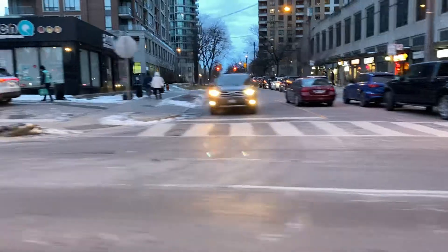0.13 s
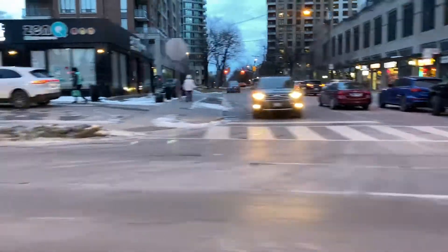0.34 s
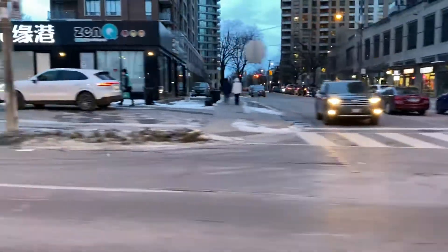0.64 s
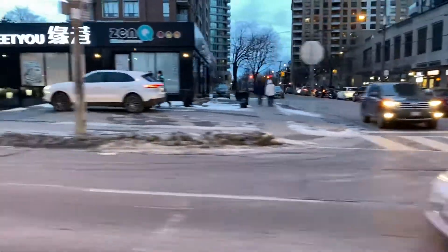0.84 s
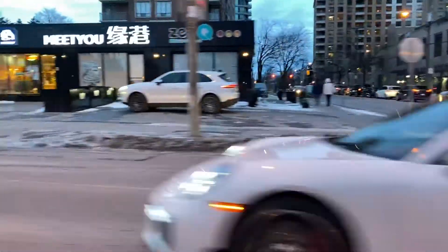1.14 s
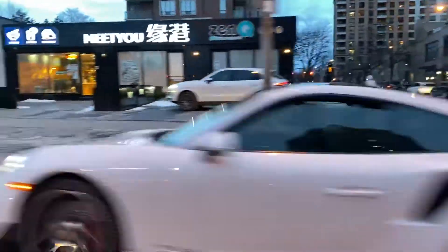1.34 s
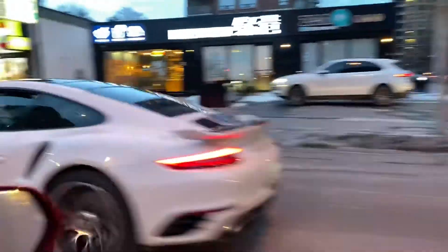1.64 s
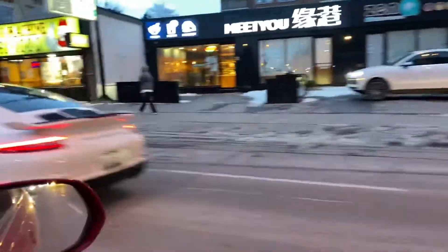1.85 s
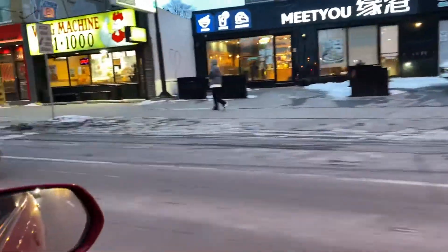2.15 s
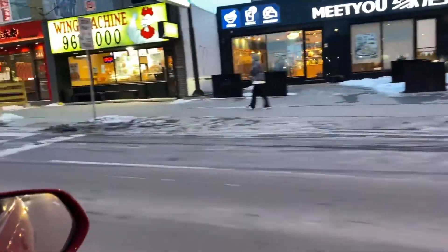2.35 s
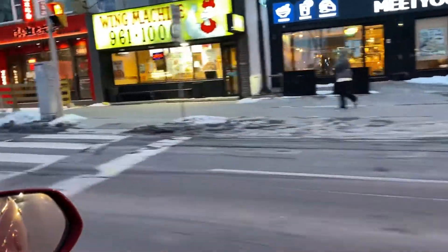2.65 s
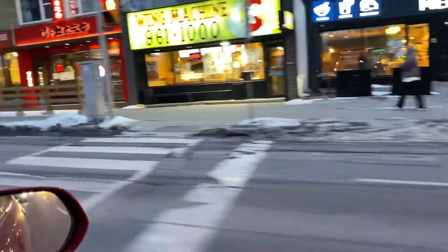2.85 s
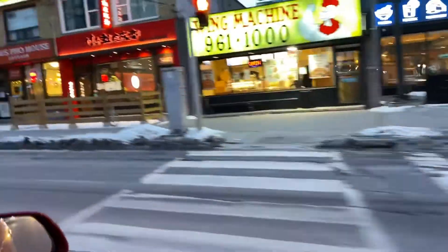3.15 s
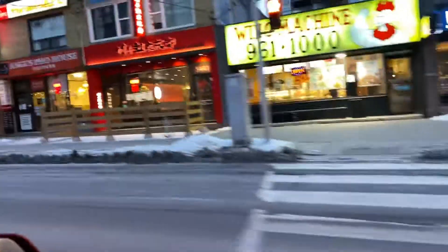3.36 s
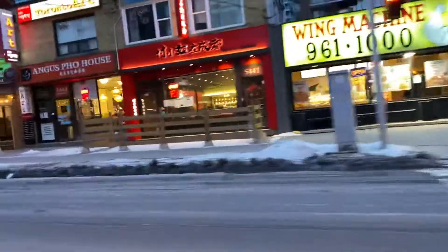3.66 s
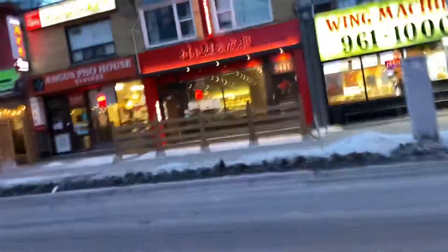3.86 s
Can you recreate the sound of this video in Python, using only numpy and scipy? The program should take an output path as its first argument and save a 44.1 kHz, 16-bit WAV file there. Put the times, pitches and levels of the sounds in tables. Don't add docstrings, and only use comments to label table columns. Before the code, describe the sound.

Heard from a phone in a car window, a turbo sports car pulls past loudly, snaps off the throttle, catches the next gear briefly, then recedes with low pops, chopped falling whistle and faint street rumble.

```python
import sys
import numpy as np
from scipy import signal
from scipy.io import wavfile
from scipy.ndimage import uniform_filter1d

SR = 44100
rng = np.random.default_rng(int(sys.argv[2]) if len(sys.argv) > 2 else 0)


def gain_from_decibels(decibels):
    exponent = np.asarray(decibels, float) / 20
    return 10 ** exponent


def inscribe(sig):
    pcm = np.round(np.clip(np.atleast_2d(sig).T, -1, 1) * 32767)
    wavfile.write(sys.argv[1], SR, pcm.astype(np.int16))


N = 176400
T = np.arange(N) / SR

# time_s, firing_hz, exhaust_level_db, gas_flow_db
ENGINE_RUN = [(0, 69.37, -15.5, -22.5), (.45, 76.66, -14.5, -24), (.62, 81.82, -12, -22),
              (.77, 85, -8.5, -17.5), (1.0, 91.06, -10.5, -29), (1.24, 97.83, -10.5, -25),
              (1.44, 97, -11, -24), (1.465, 89.3, -30.5, -34), (1.52, 73.56, -25, -37.5),
              (1.595, 66.96, -22, -31), (1.61, 66.12, -12, -28), (1.76, 64.59, -23, -37),
              (2.15, 64.02, -28, -44.5), (2.4, 63.87, -19, -40.5), (2.67, 62.7, -29, -42),
              (2.71, 63.11, -27.5, -48.5), (3.2, 60.84, -31.5, -48.5), (4, 61.2, -27.5, -45.5)]
# multiple_of_firing, loaded_db, throttle_shut_db, gear_catching_db, coasting_db
FIRING_ORDERS = [(.5, -15, -15, -22, -30), (1, -3, 6, -10, 0), (1.5, -22.5, -17, -29, -26),
                 (2, -6, -20, -7, -2), (3, .5, 4, 1.5, -8), (4, 0, -26, -8, -13.5),
                 (5, -5.5, -27, -26, -12.5), (6, -9, -39, -3.5, -8.5), (7, -14, -27, -20, -57),
                 (8, -24, -43, -27, -48), (9, -26, -37, -30, -49), (10, -13, -44, -41, -53)]
# frequency_hz, gain_db
PIPE_RESPONSE = [(40, -8.5), (97, 8), (170, -3), (230, 2.5), (285, 9.5), (330, -7.5), (400, 1.5), (900, -6)]
# frequency_hz, width_hz, gain_db
STANDING_WAVES = [(172.7, 17, 9), (196, 7, -1), (216.6, 10, 5.5), (338.6, 8.2, 4.5), (365, 6.3, -14.5),
                  (420, 30, 1), (467, 4.9, -6), (539, 24, 6.5), (647, 36, 2.5), (720, 30, 8),
                  (822, 25, 12.5)]
# frequency_hz, density_db_per_hz
LOADED_ROAR = [(40, -34), (90, -31), (280, -13), (450, -22), (750, -19.5), (1300, -28.5), (2500, -45),
               (16000, -64.5)]
# frequency_hz, density_db_per_hz
COASTING_ROAR = [(40, -62), (130, -3.5), (400, -17), (1250, -27.5), (2200, -38.5), (6500, -45.5),
                 (10000, -47), (16000, -49.5)]
# frequency_hz, density_db_per_hz
INTAKE_RUSH = [(600, -24), (1450, 2.5), (1800, 2.5), (2300, -1), (4000, -6), (8000, -12), (16000, -13.5)]
# frequency_hz, density_db_per_hz
STREET_WASH = [(26, -22), (48, 4.5), (125, -12), (160, -16.5), (370, -27), (2200, -43.5), (5000, -87.5),
               (16000, -71)]
# start_s, peak_db, pitch_hz
POP_EVENTS = [(.082, 3, 105), (0.089, -18, 380), (.174, -22, 600), (.789, -13, 766), (1.49, -20, 80),
              (1.578, -20, 245), (1.601, -30, 202), (1.788, -12, 390), (1.833, -11.5, 390),
              (1.88, -43, 380), (1.899, -16.5, 399), (1.928, -16, 350), (1.96, -23, 232.1),
              (1.995, -16.5, 393), (2.05, -16.5, 378), (2.193, -12.5, 349.3), (2.25, -18, 406),
              (2.328, -15, 420), (2.41, -16, 390), (2.477, -25, 366), (2.512, -18, 352), (2.542, -36, 300),
              (2.638, -22, 380), (2.68, -18, 376.5), (2.734, -33, 248), (3.021, -38, 319.6),
              (3.647, -23, 299), (3.896, -12.5, 390), (3.94, -13.5, 289.8), (3.97, -19, 240.7)]
# time_s, pitch_hz, level_db
SPOOL_DOWN = [(1.47, 12700, -45), (1.52, 11810, -39.5), (1.585, 11400, -34), (1.64, 10500, -42.5),
              (1.78, 9030, -34.5), (1.94, 7478, -40.5), (2.03, 6913, -54.5), (2.16, 6430, -51),
              (2.32, 5560, -45), (2.55, 4953, -50), (2.78, 4150, -52.5), (2.91, 3880, -44),
              (2.99, 3724, -49.5), (3.09, 3620, -42), (3.16, 3470, -48), (3.27, 3300, -47),
              (3.36, 3180, -56.5), (3.62, 2900, -64)]
# frequency_hz, width_hz, gain_db
DUCT_MODES = [(2950, 320, 10), (3290, 320, 10), (3690, 320, 10), (4080, 320, 8), (4400, 320, 5),
              (5050, 550, 4), (5700, 550, 5), (6450, 600, 1), (7200, 800, 1)]
# frequency_hz, coherence (0 to 1)
PORT_COHERENCE = [(60, .99), (350, .98), (900, .82), (1600, .72), (3000, .82), (5000, .82), (6800, .97),
                  (15000, .96)]
# frequency_hz, left_over_right_db
PORT_LEVEL = [(60, 2.4), (250, 3.4), (600, 1.8), (900, 3), (2000, 2.6), (5000, 2.2), (7000, .2), (16000, 0)]
# frequency_hz, right_lead_rad
NEAR_PHASE = [(0, 0), (300, -.25), (700, -.8), (1300, -.9), (2300, -.6), (3500, -.2), (6750, 0),
              (15300, 12.57), (22050, 12.57)]
# frequency_hz, right_lead_rad
FAR_PHASE = [(0, 0), (600, -1.1), (1300, -3.1), (2300, -6.6), (3500, -6.75), (6750, -6.28), (15300, 6.28),
             (22050, 6.28)]

LIFT_S, SHIFT_S, CATCH_END_S = 1.46, 1.6, 1.79
COASTING_DB, LOADED_DB = -21, -14
FULL_HZ = 97
POP_T60_S = 0.063
BURBLE_START_S, BURBLE_END_S, BURBLE_PER_S, BURBLE_DB = 2, 2.7, 300, -0.5
SWEEP, WOBBLE, CHOP_DB = .06, .018, 6.5
CHIRP_S = 3.0815
VENT_S, VENT_LEN_S, VENT_DB = 1.554, 0.17, -40.5
ECHO_DB, ECHO_T60_S = -11.5, 0.69
START_S = .0722


def evened(x):
    return x / np.sqrt(np.mean(x ** 2) + 1e-20)


def read(points, hz):
    f, value = np.transpose(points)
    return np.interp(np.log(hz + 1), np.log(f + 1), value)


def curve(table, column):
    rows = np.array(table)
    return np.interp(T, rows[:, 0], rows[:, column])


def slow(top_hz):
    t = T[::64]
    f = np.geomspace(top_hz / 12, top_hz, 16)[:, None]
    sines = np.sin(2 * np.pi * (f * t + rng.random((16, 1))))
    return np.interp(T, t, evened((sines / f ** 0.28).sum(0)))


def resonate(x, hz, width):
    carrier = np.exp(2j * np.pi * np.cumsum(hz * np.ones(len(x))) / SR)
    r = np.exp(-np.pi * abs(width) / SR)
    return 2 * (carrier * signal.lfilter([1 - r], [1, -r], x / carrier)).real


def fuzz(noise, hz, width):
    return evened(resonate(resonate(noise, hz, width), hz, width))


def hiss(shape, patchy_db, flicker_db):
    frames, hz = N // 256 + 5, np.fft.rfftfreq(1024, 1 / SR)
    a, b, c, d, patches = rng.standard_normal((frames, 513, 5)).T
    patches = uniform_filter1d(patches, size=10, axis=0)
    patches = evened(uniform_filter1d(patches, size=10, axis=1))
    flicker = evened(uniform_filter1d(rng.standard_normal(frames), size=5))
    same = np.clip(read(PORT_COHERENCE, hz), -1, 1)[:, None]
    left = a + 1j * b
    right = same * left + np.sqrt(1 - same ** 2) * (c + 1j * d)
    level_db = read(shape, hz)[:, None] + patchy_db * patches + flicker_db * flicker
    bass_cut = (hz ** 4 / (hz ** 4 + 55 ** 4))[:, None]
    z = np.array([left, right]) * gain_from_decibels(level_db) * bass_cut
    return signal.istft(z, nperseg=1024, noverlap=768)[1][:, :N]


def in_band(x):
    band = signal.butter(4, [700, 2500], "band", fs=SR, output="sos")
    part = signal.sosfilt(band, x.mean(0))
    return x / np.sqrt(np.mean(part ** 2))


def firing():
    load = np.clip((curve(ENGINE_RUN, column=2) - COASTING_DB) / (LOADED_DB - COASTING_DB), 0, 1)
    return np.cumsum(curve(ENGINE_RUN, column=1)) / SR, load


def exhaust():
    turns, load = firing()
    load = np.maximum(load, T < CATCH_END_S)
    hz = curve(ENGINE_RUN, column=1)
    wander_db = 4.5 - 2.7 * load
    drift_rad = .7 - .5 * load
    stage = np.searchsorted([LIFT_S, SHIFT_S, CATCH_END_S], T)
    pulling = T < LIFT_S
    out = np.zeros(N)
    for k, *stage_db in FIRING_ORDERS:
        db = uniform_filter1d(np.array(stage_db, float)[stage], size=500)
        nodes = sum(gain * np.exp(-((k * hz - f) / w) ** 2) for f, w, gain in STANDING_WAVES)
        db = db + nodes * pulling + read(PIPE_RESPONSE, k * hz)
        slope_db_per_hz = -.6 * (k % 1 > 0) + .3 * (k > 4)
        db = db + pulling * slope_db_per_hz * (hz - FULL_HZ)
        db = db + wander_db * slow(12)
        out += gain_from_decibels(db) * np.cos(2 * np.pi * k * turns - 0.3586 * k * k + drift_rad * slow(12))
    return gain_from_decibels(curve(ENGINE_RUN, column=2)) * out


def roar():
    turns, load = firing()
    load = np.maximum(load, T < SHIFT_S)
    gate = evened(gain_from_decibels(np.cos(2 * np.pi * turns - 1)))
    gas = load * in_band(hiss(LOADED_ROAR, 1.5, 0.44))
    gas = gas + (1 - load) * in_band(hiss(COASTING_ROAR, 1.4, 0.77))
    rush = in_band(hiss(INTAKE_RUSH, 0.9, 0.66))
    rasp = gain_from_decibels(1) * fuzz(rng.standard_normal(N), 1780, 520)
    rush_db = -4 + (curve(ENGINE_RUN, column=1) - FULL_HZ)
    rush = load * gain_from_decibels(rush_db) * (rush + rasp)
    return gain_from_decibels(curve(ENGINE_RUN, column=3) + 1) * gate * (gas + rush)


def street():
    fade = np.clip((0.87 - T) / 0.12, 0, 1)
    thrum = gain_from_decibels(-19) * fade * fuzz(rng.standard_normal(N), 57.7, 41)
    return gain_from_decibels(-27 + 1.5) * evened(hiss(STREET_WASH, 1.7, 2.1)) + thrum


def pop(hz):
    t = np.arange(4000) / SR
    ring = np.sin(2 * np.pi * hz * t) + 0.33 * np.sin(2 * np.pi * 1.466 * hz * t + 1)
    crack = 0.041 * rng.standard_normal(4000) * gain_from_decibels(-60 * t / 0.0039)
    return (ring + crack) * np.minimum(t / 0.00067, 1) * gain_from_decibels(-60 * t / POP_T60_S)


def pops():
    out = np.zeros(N + 4000)
    for start_s, peak_db, pitch_hz in POP_EVENTS:
        out[round(start_s * SR):][:4000] += gain_from_decibels(peak_db) * pop(pitch_hz)
    on = (T > BURBLE_START_S) & (T < BURBLE_END_S)
    level = gain_from_decibels(curve(ENGINE_RUN, column=2) + BURBLE_DB)
    for hz in (224, 280, 390, 410):
        strikes = rng.random(N) < BURBLE_PER_S / 4 / SR
        kicks = strikes * gain_from_decibels(2.67 * np.clip(rng.standard_normal(N), -2, 1)) * on
        out[:N] += level * signal.oaconvolve(kicks, pop(hz))[:N]
    return out[:N]


def echoes(x):
    t = np.arange(12000) / SR
    tail = rng.standard_normal(12000) * gain_from_decibels(-60 * t / ECHO_T60_S) * (t > .006)
    return x + gain_from_decibels(ECHO_DB) * signal.oaconvolve(x, tail / np.linalg.norm(tail))[:N]


def turbo():
    turns, _ = firing()
    hz, noise = curve(SPOOL_DOWN, column=1), rng.standard_normal((4, N))
    phase = 2 * np.pi * (turns - np.interp(CHIRP_S, T, turns))
    swept = np.cumsum(hz * (1 - SWEEP * np.sin(phase) + WOBBLE * slow(300))) / SR
    chop_db = CHOP_DB * (np.cos(phase) - 1.5) * np.clip(4000 / hz, 0, 1) ** 3
    chop = gain_from_decibels(chop_db + 1.6 * slow(60))
    pure = .75 * np.clip(4100 / hz, 0, 1) ** 5
    tone = pure * 2.96 * np.sin(2 * np.pi * swept)
    breath = (1 - pure) * fuzz(noise[0], hz, 1100)
    overtone = gain_from_decibels(-22) * fuzz(noise[1], np.minimum(2 * hz, 20000), 870) * (hz < 7000)
    voice = chop * (tone + breath + overtone)
    duct = sum(gain_from_decibels(db) * resonate(resonate(voice, f, w), f, w) for f, w, db in DUCT_MODES)
    direct = voice * gain_from_decibels(-15 * np.clip(4400 / hz, 0, 1) ** 5)
    gust = gain_from_decibels(5.5 + 3.5 * slow(90)) * np.clip(hz / 3000 - 3, 0, 1) * fuzz(noise[3], hz, 2000)
    level = gain_from_decibels(curve(SPOOL_DOWN, column=2)) * (T > SPOOL_DOWN[0][0])
    whistle = echoes(level * (direct + duct + gust))
    moan = gain_from_decibels(-53 - 27 * ((T - 2.55) / 0.84) ** 2) * fuzz(noise[2], 3520, 220)
    vent = gain_from_decibels(VENT_DB - 9 * ((T - VENT_S) / VENT_LEN_S) ** 2) * fuzz(noise[2][::-1], 6500, 6000)
    return vent + whistle + moan


def lean(x):
    hz, t, z = signal.stft(x, SR, nperseg=1024)
    near = t < 1.46
    db = read(PORT_LEVEL, hz)[:, None] + np.where(near, 0, -1.5 * (hz < 500)[:, None])
    near_rad = np.interp(hz, *np.transpose(NEAR_PHASE))[:, None]
    far_rad = np.interp(hz, *np.transpose(FAR_PHASE))[:, None]
    turn = np.exp(.5j * np.where(near, near_rad, far_rad))
    ports = z * gain_from_decibels(np.array([db, -db]) / 2) * np.array([1 / turn, turn])
    return signal.istft(ports, SR, nperseg=1024)[1][:, :N]


def scene():
    return lean(exhaust() + pops() + roar() + street() + turbo())


def joint(x):
    hz, t, z = signal.stft(np.array([x[0] + x[1], x[0] - x[1]]) / 2, SR, nperseg=2048)
    power = uniform_filter1d(abs(z) ** 2, size=14, axis=1)
    power = uniform_filter1d(power, size=3, axis=2) + 1e-20
    side_drop_db = np.where(hz < 6200, -15, -6.5)[:, None]
    keep_mid = power[0] > power[1] * gain_from_decibels(2 * -8.3)
    keep_side = power[1] > power[0] * gain_from_decibels(2 * side_drop_db)
    keep = np.array([keep_mid, keep_side]) | (hz < 3300)[:, None]
    z = z * keep * (hz < 15900)[:, None]
    mid, side = signal.istft(z, SR, nperseg=2048)[1][:, :N]
    return np.array([mid + side, mid - side])


def low_pass(x):
    return signal.sosfilt(signal.butter(12, 16710, fs=SR, output="sos"), x)


def record(dry):
    limited = 0.88 * np.tanh(dry / 1.374)
    mix = joint(limited) * (T > START_S)
    return low_pass(mix)


dry = scene()
out = record(dry)
inscribe(out)
```